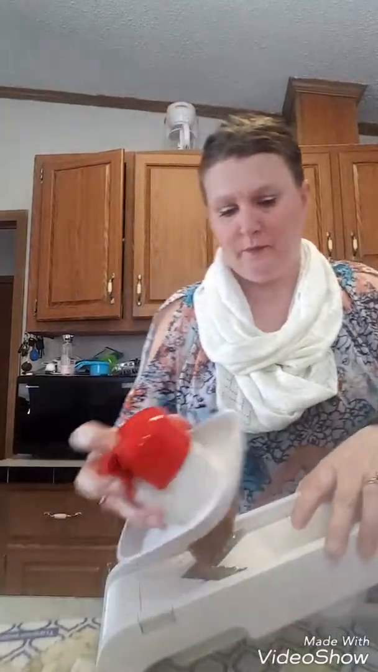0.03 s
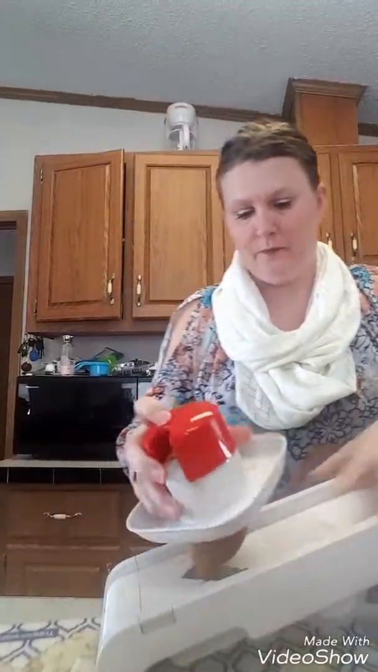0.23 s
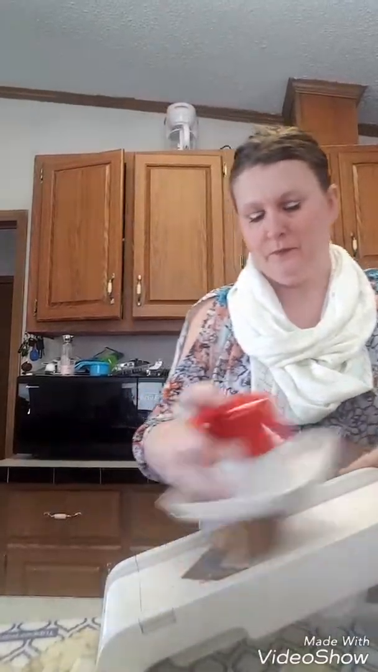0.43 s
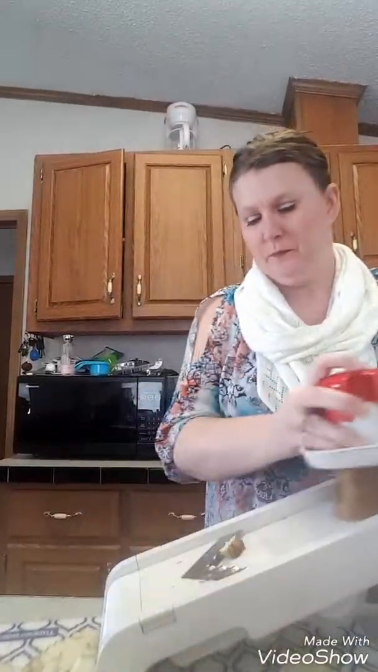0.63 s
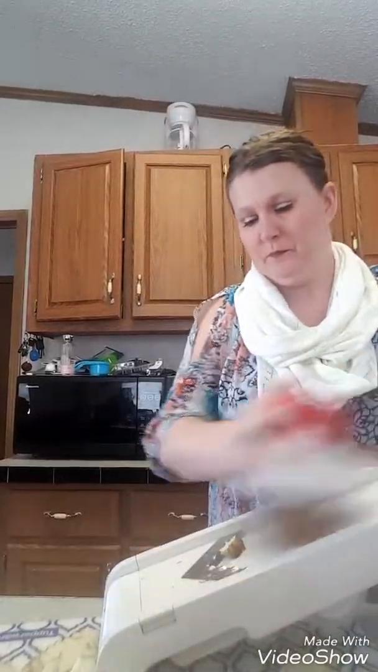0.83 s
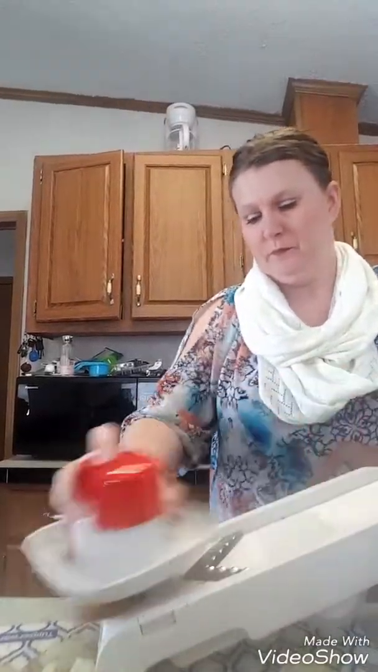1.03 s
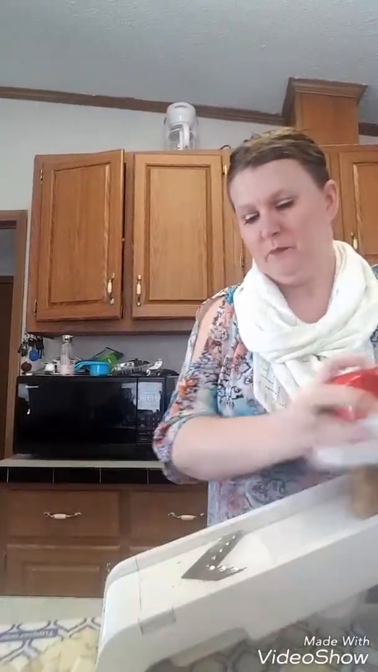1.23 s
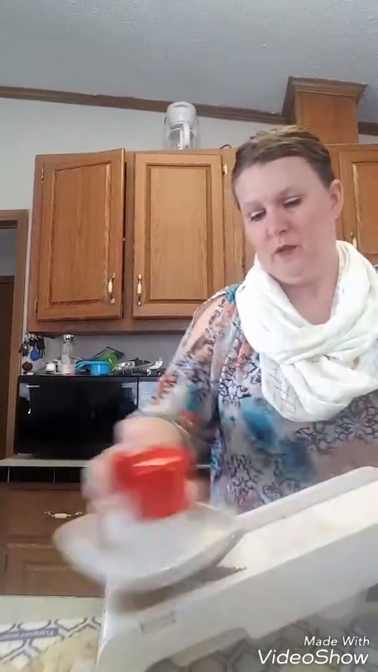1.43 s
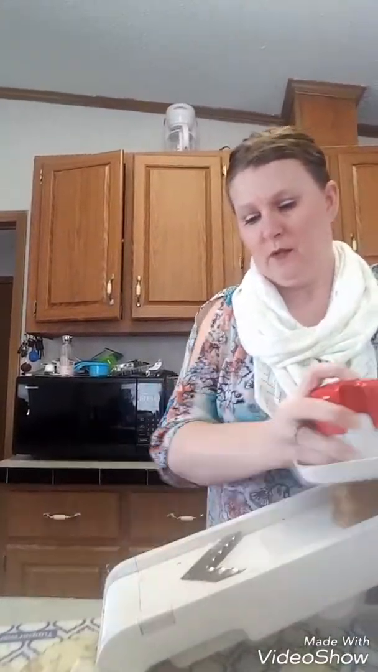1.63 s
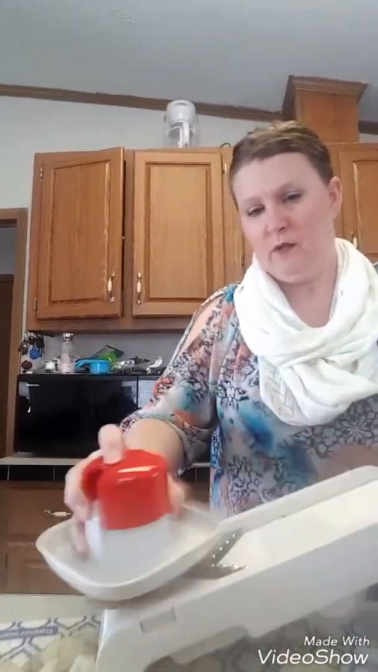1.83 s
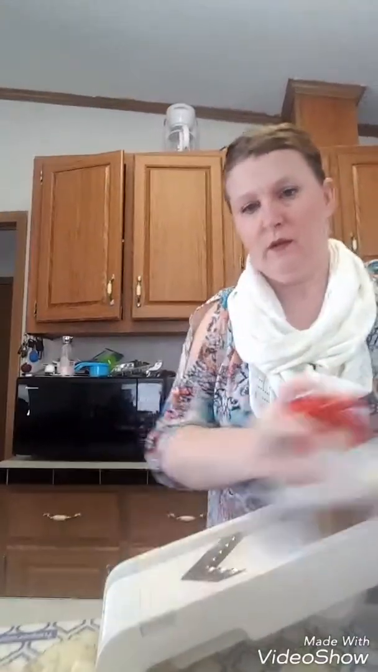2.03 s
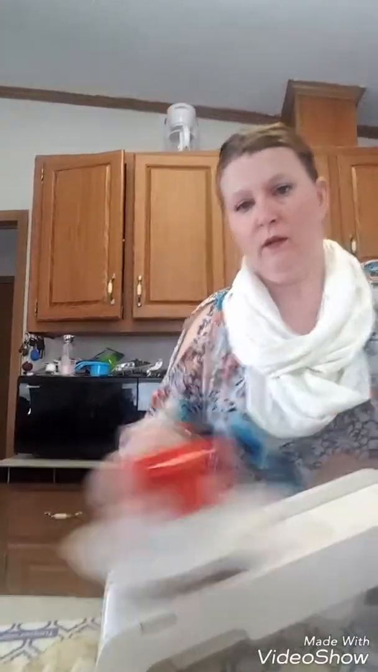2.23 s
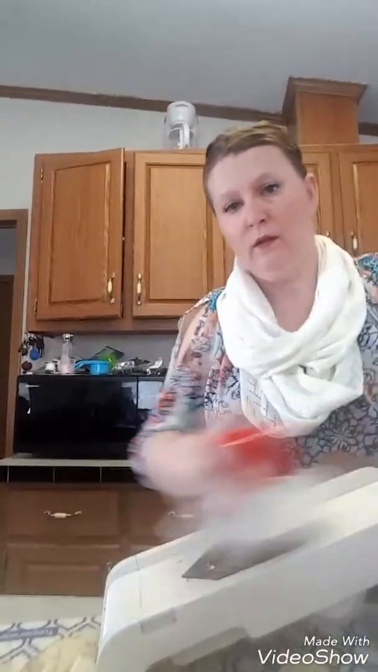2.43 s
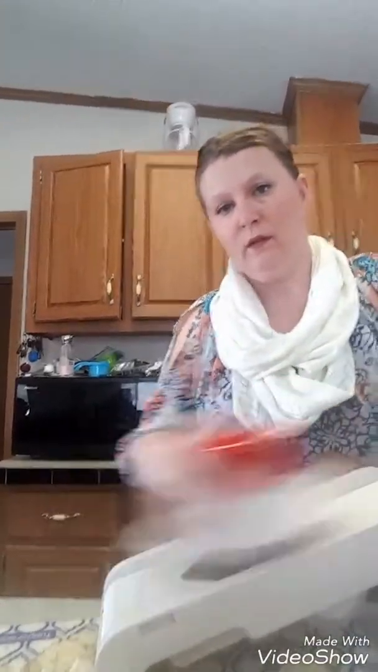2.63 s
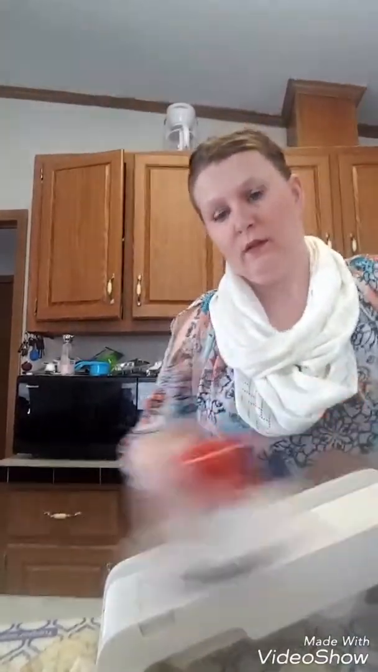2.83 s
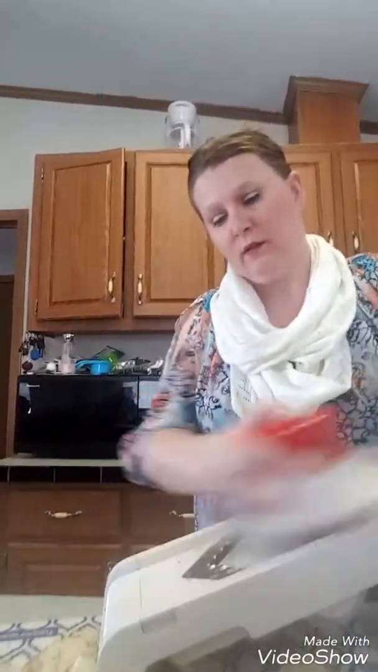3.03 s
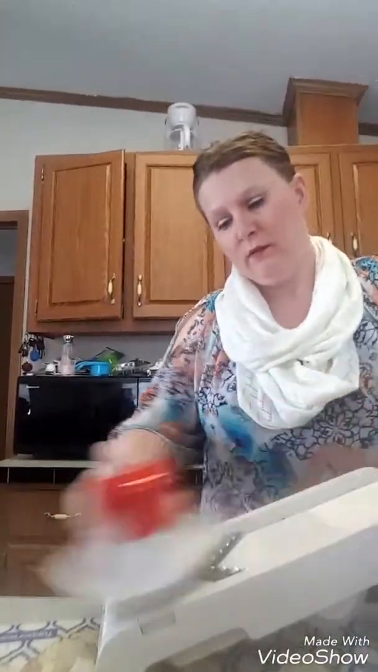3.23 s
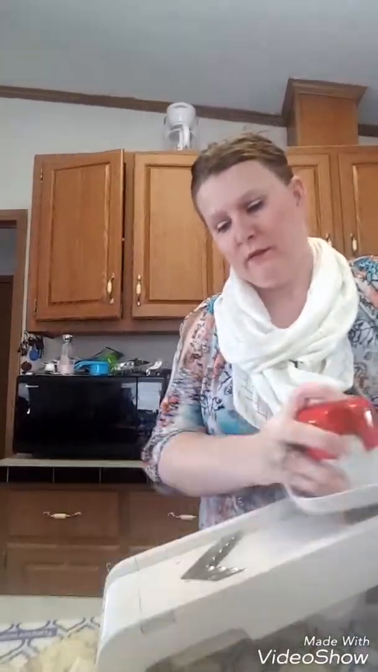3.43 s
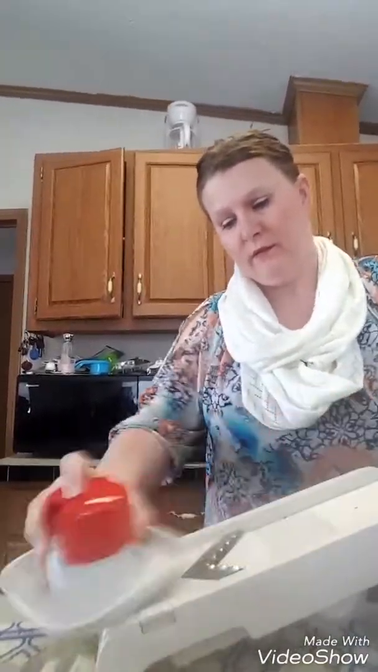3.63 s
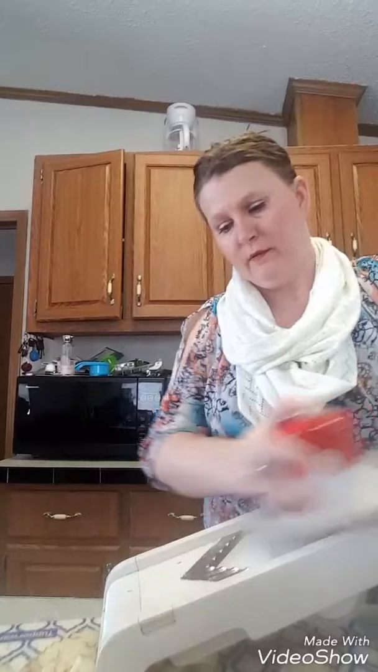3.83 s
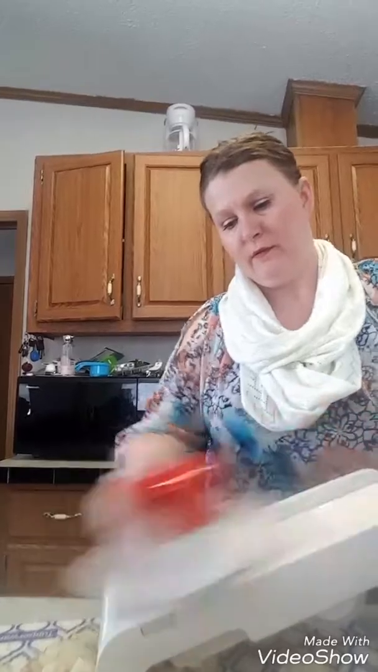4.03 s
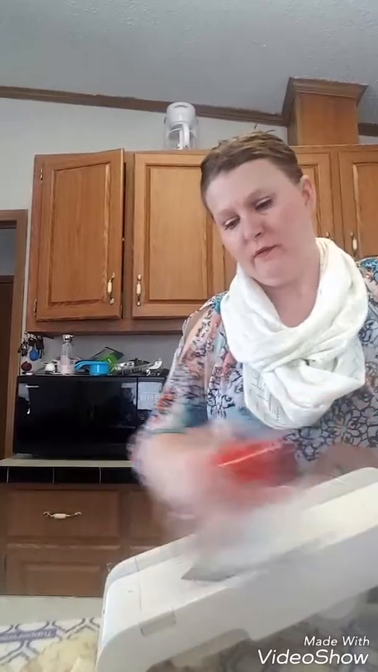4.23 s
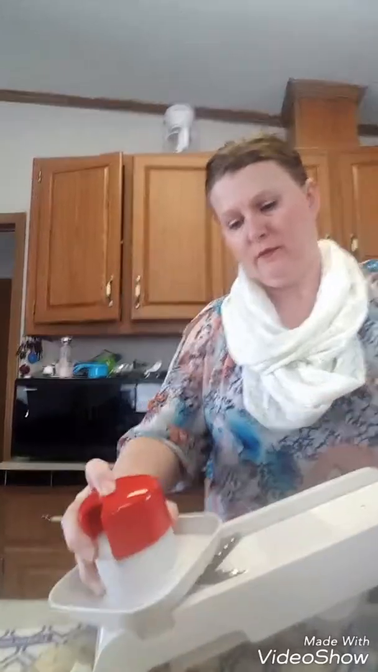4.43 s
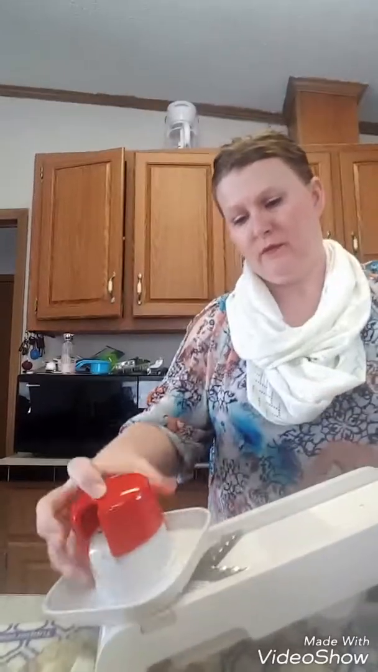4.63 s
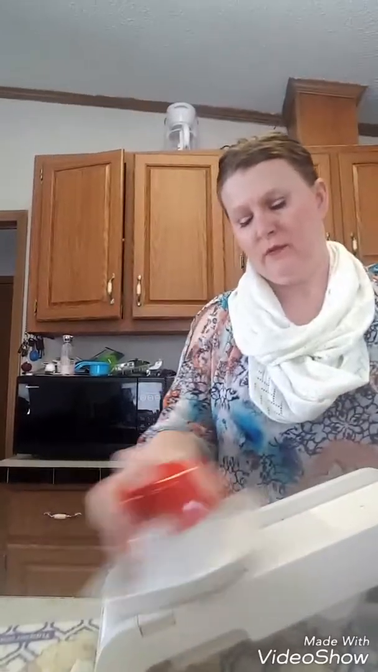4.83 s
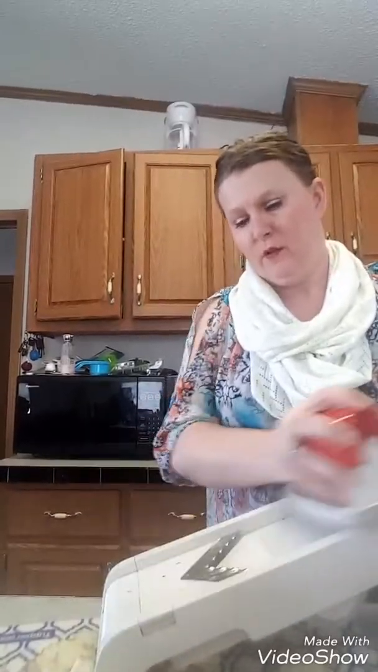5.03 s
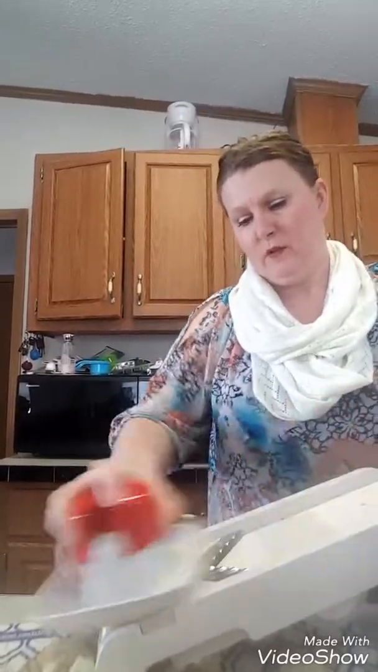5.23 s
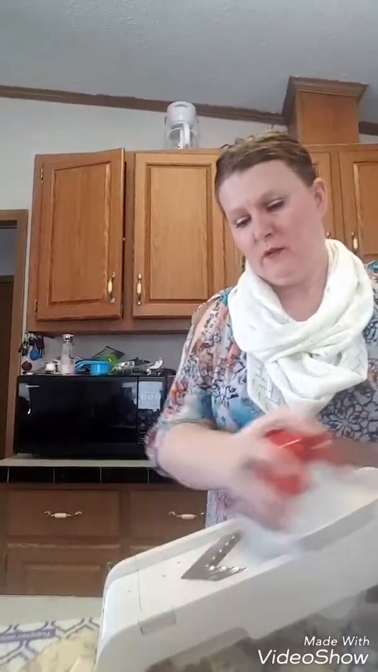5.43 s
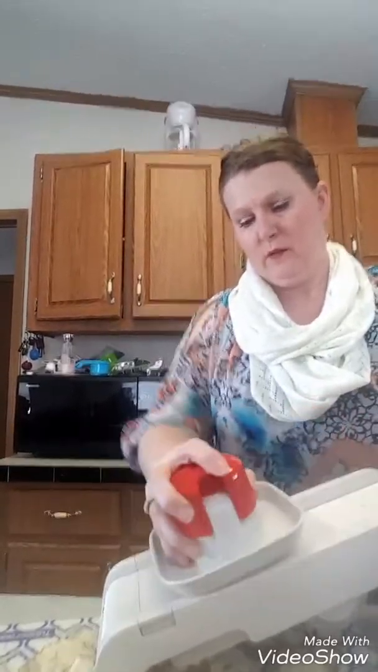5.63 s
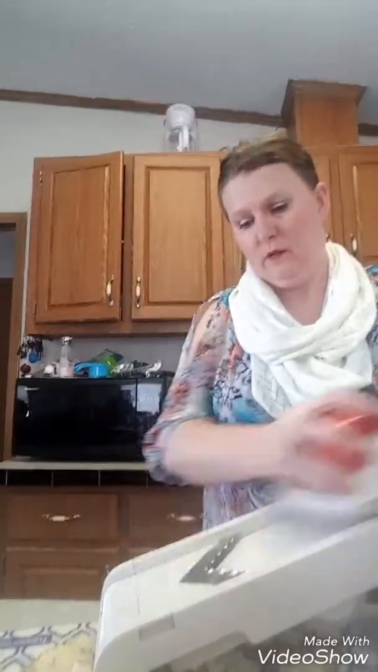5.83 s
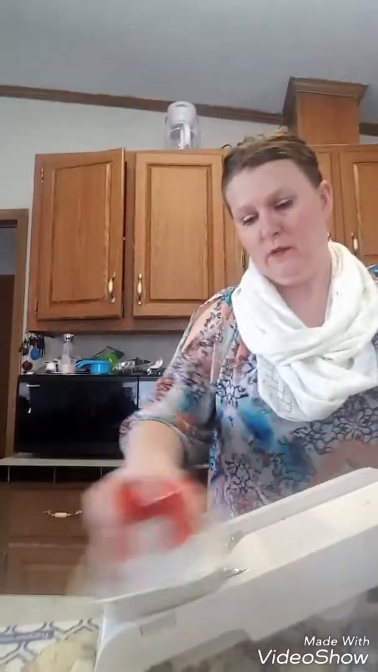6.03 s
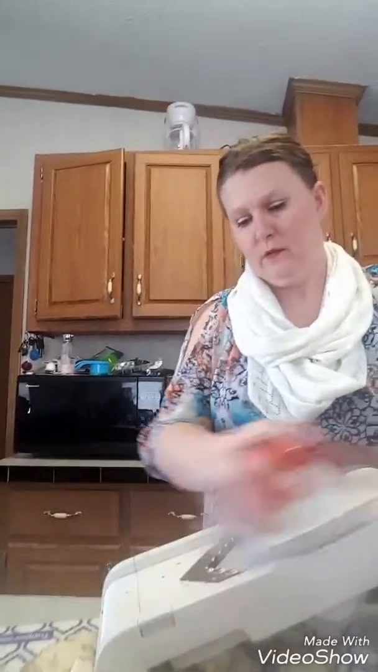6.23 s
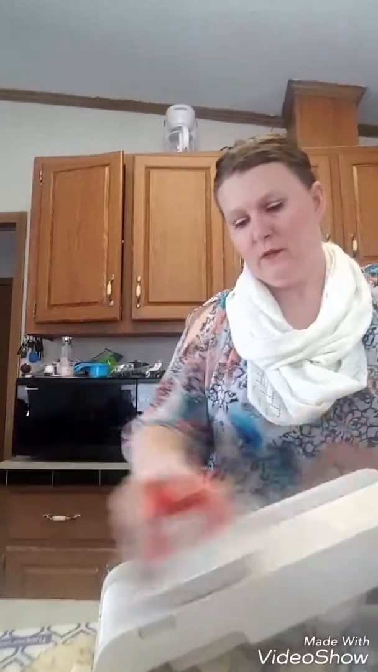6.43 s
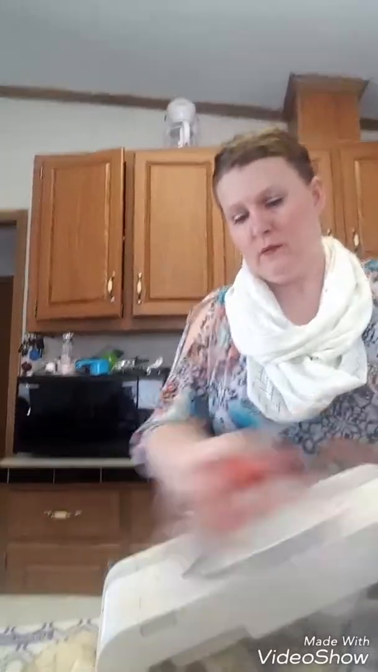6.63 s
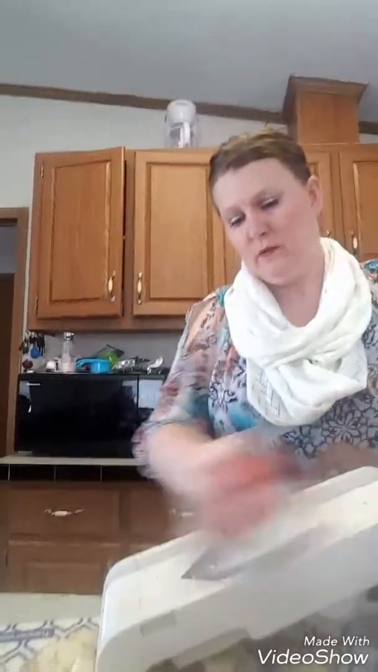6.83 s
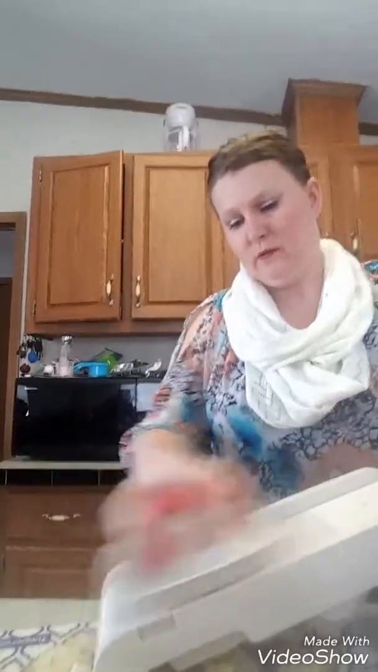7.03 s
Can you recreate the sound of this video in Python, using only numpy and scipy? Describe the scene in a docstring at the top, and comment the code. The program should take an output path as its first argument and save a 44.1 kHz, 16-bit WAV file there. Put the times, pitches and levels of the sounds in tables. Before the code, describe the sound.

Close up in a small lively kitchen, a potato held in a plastic guard scrapes faintly and knocks on a hollow slicer. From about one second, crisp wet cuts come steadily, nearly three a second, with rasping slides, low counter rumble and clacks between. A short pause holds only knocks, then louder, uneven strokes run to the end.

```python
"""A potato in a plastic guard slides over a slicer in a small lively room: first a few faint scrapes and knocks.
From one second on, cuts follow steadily: cells burst at the blade as a bright tearing and the drag rings the frame.
Between cuts stick-slip jolts the counter, rasps the frame and hisses wetly; blows on the hollow frame make its
panels resonate. After 4.4 s the cuts pause amid knocks; from 5.2 s they resume, some faint, to the end at 7.1 s.
Decaying room tails and steady air noise lie beneath, and faint patches flicker between the channels."""
import sys
import numpy as np
from scipy import signal
from scipy.fft import rfft, irfft, next_fast_len
from scipy.io import wavfile
from scipy.ndimage import uniform_filter1d

SR = 44100
rng = np.random.default_rng(int(sys.argv[2]) if len(sys.argv) > 2 else 0)


def to_linear_factor(level_db):
    """Convert decibel levels (scalar or array-like) to linear amplitude factors."""
    exponent = np.asarray(level_db, float) / 20
    return 10 ** exponent


def transcribe(u):
    """Save the signal u as a 16-bit wav file named by the first command-line argument.

    u: samples, shape (n,) or (channels, n), limited to [-1, 1]; the rate is SR.
    q: integer samples, one column per channel.
    """
    v = np.clip(np.atleast_2d(u).T, -1, 1)
    q = np.round(v * 32767).astype(np.int16)
    wavfile.write(sys.argv[1], SR, q)


N = 313110  # samples, 7.1 s

# Blade passing through the potato. Each row: start in seconds, time from start to fullest in seconds,
# length in seconds, tearing level in dB, frame shaking level in dB.
CUT_ROWS = [(0.989, 0.022, 0.07, -23.5, -29.5), (1.489, 0.034, 0.063, -19.5, -28),
            (1.866, 0.024, 0.06, -18.5, -30.5), (2.215, 0.023, 0.064, -20.5, -32.5),
            (2.367, 0.018, 0.072, -27.5, -27.5), (2.576, 0.021, 0.052, -17.5, -30),
            (2.945, 0.032, 0.06, -21.5, -30.5), (3.301, 0.027, 0.051, -18, -28.5),
            (3.657, 0.017, 0.055, -21, -29), (4.01, 0.028, 0.063, -21.5, -28.5),
            (4.373, 0.0091, 0.064, -22, -28.5), (5.242, 0.022, 0.059, -23.5, -25),
            (5.412, 0.021, .06, -31, -24.5), (5.462, 0.0042, 0.048, -44, -29.5),
            (5.61, 0.031, 0.066, -31.5, -35.5), (6.107, 0.015, 0.066, -26, -28.5),
            (6.522, 0.046, 0.065, -22.5, -27.5), (6.762, .006, 0.048, -37, -31.5),
            (6.968, 0.045, .08, -25, -28.5)]
# Guard and potato striking the frame. Each row: time in seconds, clack peak in dB, clack centre in Hz,
# thud peak in dB against the clack, click peak in dB against the clack.
KNOCK_ROWS = [(0.0667, -34, 3120, -13, -20), (0.1565, -36, 1700, -7, -29), (0.5242, -25.5, 3570, -4, 2),
              (0.5531, -22, 2970, -3.5, -6.5), (0.9747, -29.5, 3060, 1.5, -16), (0.9961, -12, 2720, -7, -5),
              (1.2067, -20.5, 2160, -9, -17), (1.2895, -16, 2830, -12.5, -3),
              (1.4814, -25.5, 2940, -6, -20), (1.492, -14.5, 2840, -5, -8), (1.6511, -26, 2090, 3.5, -3),
              (1.699, -15, 2680, -1.5, -1), (1.8662, -13, 2230, -3, -9), (1.9599, -20, 1690, -5, -12),
              (2.0577, -15.5, 2910, -5.5, -6), (2.2189, -12.5, 2730, -8.5, -13),
              (2.3544, -22.5, 1860, -5, -4), (2.3735, -10.5, 3550, -9, -11), (2.4139, -13.5, 2710, -11, -7),
              (2.5765, -14, 2790, -1.5, -6), (2.7212, -22.5, 1830, -8, -4), (2.7771, -17, 1980, -1.5, -6.5),
              (2.8689, -21.5, 1800, -10.5, -23), (2.9282, -15, 2050, -8, -6.5),
              (2.9542, -13.5, 1940, -18, -7), (3.0774, -30, 1880, -3, -21), (3.1462, -17, 2100, -1.5, -2),
              (3.3064, -12.5, 2590, 0, -5), (3.4082, -23, 1790, -4.5, -7), (3.4471, -20.5, 1890, -2.5, -3),
              (3.4945, -19, 1950, 3.5, -8), (3.6012, -39, 1900, 8.5, -4), (3.6471, -21, 2070, -5, -22),
              (3.6611, -16, 2000, -7, -10), (3.8117, -20, 1940, -2, -8), (3.8267, -14.5, 3600, -2.5, -1),
              (3.8581, -10.5, 1760, 1.5, -5), (3.9913, -19, 1990, 10, -12), (4.2213, -18.5, 1820, 4, 0),
              (4.3331, -7.5, 2000, -3, -16), (4.372, -4, 2960, -9.5, 3.5), (4.6543, -27, 1660, -7, -25),
              (4.7227, -40.5, 1660, 8, 3.5), (4.8698, -32, 1650, 2.5, -3), (4.9144, -26, 1870, 1.5, -14),
              (4.9564, -21.5, 2870, -4, -18), (4.9821, -15.5, 2730, -3, -16), (5.017, -9, 2700, 2.5, -14),
              (5.0414, -13.5, 1680, -5.5, -5), (5.2061, -26.5, 1960, 7, -5), (5.233, -12, 1750, -3, -3),
              (5.2784, -15, 2160, -1, -10), (5.3123, -9.5, 3130, -2.5, -10), (5.3274, -19, 1870, 9.5, -8),
              (5.3564, -10, 1600, -14, -17), (5.3677, -6, 3030, -8.5, -6.5), (5.4395, -3, 1760, -24, -25),
              (5.46, 0, 2550, -19, -10), (5.4754, -6.5, 2500, -16.5, -3.5), (5.5824, -25.5, 2120, -3, -8),
              (5.6326, -16, 1680, -10.5, -16), (5.7813, -28.5, 3520, -7.5, 9.5),
              (5.9559, -37.5, 1950, 4, -7), (6.0681, -32, 1890, -0.5, -10), (6.0934, -20.5, 1780, -2, -9),
              (6.114, -6.5, 2040, -15, -1), (6.2223, -18, 1990, -6.5, -20), (6.2706, -25.5, 2220, 2, -5),
              (6.3345, -4, 2000, -6, -15), (6.3604, -11, 1960, -13, -6.5), (6.3924, -7, 1980, -6.5, -12),
              (6.4712, -13.5, 2110, -7, -11), (6.5271, -8.5, 2000, -6, 2.5), (6.6298, -19, 1780, -0.5, -23),
              (6.6707, -26, 2160, 5.5, -8), (6.7466, -8, 1700, -6, -17), (6.7635, -2, 2400, -18.5, -12),
              (6.9825, -11, 2110, -6, -19)]
# Potato sliding along the ramp. Each row: start in seconds, length in seconds, counter rumble in dB,
# frame scrape in dB, wet hiss in dB.
STROKE_ROWS = [(-.08, 0.13, -32.5, -36.5, -40.5), (.14, 0.063, -56, -54, -68),
               (0.253, 0.034, -53, -76, -54.5), (0.339, 0.1, -59, -50.5, -70),
               (0.499, 0.098, -40.5, -45, -46), (0.61, 0.11, -53, -65, -55.5),
               (0.941, 0.042, -51, -46, -53), (0.956, 0.15, -40, -47, -40), (1.141, 0.065, -42, -47, -53),
               (1.188, 0.15, -35, -38.5, -36), (1.44, 0.16, -39.5, -47, -41), (1.606, .13, -35, -36, -37.5),
               (1.838, .1, -38, -43, -48), (1.966, .13, -32, -32.5, -36), (2.184, 0.12, -42.5, -34, -51),
               (2.31, .04, -51, -42.5, -49), (2.331, .13, -32, -41, -34.5), (2.548, 0.12, -40, -54, -40.5),
               (2.691, 0.14, -30, -38.5, -39.5), (2.907, 0.13, -41, -37.5, -37),
               (3.067, 0.11, -28, -30.5, -34), (3.301, 0.08, -37.5, -51, -45),
               (3.425, 0.098, -28, -35, -38.5), (3.624, 0.14, -39, -45, -44), (3.784, .12, -31, -27.5, -38),
               (3.978, 0.12, -41, -39, -32.5), (4.125, 0.14, -29, -27, -34.5),
               (4.312, 0.18, -37.5, -41, -37.5), (4.492, .1, -45, -45.5, -57), (4.635, 0.11, -53, -55, -61),
               (4.856, .06, -56, -44.5, -50), (4.899, .21, -31.5, -30, -35),
               (5.162, 0.26, -36.5, -31.5, -33), (5.396, .14, -39.5, -47, -31.5),
               (5.554, .14, -39, -40.5, -37.5), (5.756, 0.11, -50, -51.5, -54),
               (5.842, 0.088, -52, -48.5, -58), (5.916, 0.13, -51, -56, -58.5), (6.086, 0.1, -38, -39, -34),
               (6.241, 0.099, -43, -33.5, -36), (6.316, 0.12, -33, -32.5, -36),
               (6.453, 0.16, -37.5, -44, -33), (6.623, 0.13, -40.5, -41, -37.5),
               (6.72, 0.12, -34, -41, -33.5), (6.882, 0.2, -38, -35.5, -33.5)]
# Resonances of the hollow plastic frame. Each row: frequency in Hz, width in Hz before added damping, level in dB.
FRAME_MODES = [(253, 25, -13), (416, 21, -11), (509, 72, 4), (778.4, 98, 7.5), (897, 40, 0.5),
               (1027, 114, 0.5), (1247, 38, -2), (1846, 116, -4.5), (2143, 280, -9), (2640, 106, -12),
               (2915, 330, -4.5), (3400, 220, -14.5), (4970, 280, 3), (5700, 1770, 4), (8140, 1100, -22),
               (11900, 410, -31.5)]
# Resonances of the counter. Each row: frequency in Hz, width in Hz before added damping, level in dB.
COUNTER_MODES = [(56.7, 38, 1), (108, 6, 2), (152, 30, 3.5), (231.7, 28, 0)]
# Spectrum of the tearing cells. Each row: frequency in Hz, relative level in dB per Hz.
TEAR_SPECTRUM = [(710, -12), (1200, -7.5), (1350, -13), (1850, -2.5), (2340, -6.5), (3030, -4.5),
                 (4820, -0.5), (5200, -5.5), (5920, 1.5), (7270, -6), (8270, -2.5), (11400, -9.5),
                 (13200, -13.5), (14800, -20), (15800, -17)]
# Spectrum of the wet slide. Each row: frequency in Hz, relative level in dB per Hz.
HISS_SPECTRUM = [(710, -7), (1200, 3.5), (1440, -8.5), (1690, -3), (2640, -4), (4520, -12), (5730, -6),
                 (7190, -15), (8450, -11), (11400, -27.5), (12900, -23.5), (14700, -36.5), (15800, -47)]
# Hand resting on the guard. One row: rumble in dB, scrape in dB, hiss in dB.
REST_LEVELS = [-64.5, -65, -70]
# Thud centre as the guard sinks onto the frame with the thinning potato, before the spread by spot struck.
# Each row: time in seconds, frequency in Hz.
THUD_CENTRE = [(0, 760), (1.5, 710), (1.7, 440), (4.2, 460), (4.4, 610), (5.4, 645), (6.0, 760), (7.1, 720)]
# Decay of the room. Each row: frequency in Hz, time to fall by 60 dB in seconds.
ROOM_DECAY = [(100, 0.43), (300, 0.19), (700, 0.29), (1840, 0.28), (4850, 0.23), (12800, 0.2)]
# Spectrum of the room noise. Each row: frequency in Hz, relative level in dB per Hz.
AIR_SPECTRUM = [(15, -36), (25, 5.5), (307, -6.5), (361, -2), (812, -13), (1390, -19), (1640, -17),
                (1980, -20.5), (6140, -24.5), (13100, -38), (15800, -42)]
# Overall tone: weak deep bass, uneven treble, nothing above about 16 kHz. Each row: frequency in Hz, gain in dB.
OVERALL_TONE = [(25, -26), (45, -10), (70, 1.5), (6300, 2), (7250, -2), (8300, 3), (11400, -7.5),
                (13000, 9.5), (15500, -2), (15900, -6), (16300, -60)]
# Patches that flicker between the channels. Each row: frequency in Hz, gain in dB.
FLICKER_GAIN = [(40, -15), (100, -22), (3000, -23), (6000, -17), (9000, -8.5), (14000, -9)]


def cut(start, fullest, length, tear_db, shake_db):
    """Fracture noise: cells burst densely along the blade while the drag excites the frame's resonances."""
    bite_db, exit_db, shake_sag_db = -8.5, -10, -0.5  # tearing at entry and exit; fall of the shaking over the cut
    attack_s, release_s = 0.0034, 0.023
    t = np.arange(0, length, 1 / SR)
    bursts = patchy(len(t), 9000, 2.5, 160, 2.8) * lumps(len(t), 420, 1.73)
    tear = evened(coloured(bursts, TEAR_SPECTRUM))
    drag = crackle(len(t), 1200, 2.65) * lumps(len(t), 85, 6.0)
    frame = ring(FRAME_MODES[:11], damping=1.24, spread_db=3)
    shake = evened(np.convolve(drag, frame)[:len(t)])
    fade = np.clip(t / attack_s, 0, 1) * np.clip((length - t) / release_s, 0, 1)
    depth_db = np.interp(t, [0, fullest, length], [bite_db, 0, exit_db])
    tearing = to_linear_factor(tear_db + depth_db) * tear
    shaking = to_linear_factor(shake_db + shake_sag_db * t / length) * shake
    return start, fade * (tearing + shaking)


def slide():
    """Stick-slip friction on the ribbed ramp: jolts in the counter, scrape in the frame, wet hiss."""
    rumble, scrape, hiss = stroke_levels()
    contact = lumps(N, 60, 3.15)
    jolts = signal.oaconvolve(crackle(N, 600, 1.5), ring(COUNTER_MODES, damping=1.27))[:N]
    # The contact moves along the frame: one of six spots, drawn anew every 2600 samples
    spot = np.repeat(rng.integers(0, 6, N // 2600 + 1), 2600)[:N]
    slips = crackle(N, 700, 4.7) * contact
    rasp = np.zeros(N)
    for k in range(6):
        frame = evened(ring(FRAME_MODES[:11], damping=1.15, spread_db=3.5))
        rasp += signal.oaconvolve(slips * (spot == k), frame)[:N]
    rasp = coloured(rasp, [(300, 0.5), (1000, 0.0), (3000, -4.5)])
    wet = coloured(patchy(N, 5000, 1.4, 48, 3.0) * contact, HISS_SPECTRUM)
    return rumble * evened(jolts) + scrape * evened(rasp) + hiss * evened(wet)


def stroke_levels():
    """Friction noise grows with speed: each stroke speeds up, slows and settles; gains of rumble, scrape, hiss."""
    fastest, swell = 0.47, 1.41  # share of the stroke at top speed; level ~ speed ** swell
    settle_db_per_s = 218  # dying away after the stroke
    power = np.tile(to_linear_factor(REST_LEVELS)[:, None] ** 2, N)
    for start, length, *levels_db in STROKE_ROWS:
        t = np.arange(max(-start, 0), length + 0.3, 1 / SR)
        phase = np.interp(t, [0, fastest * length, length], [0, 1, 1.7])
        speed = np.sin(np.pi / 2 * phase)
        shape = speed ** swell * to_linear_factor(-settle_db_per_s * np.maximum(t - length, 0))
        for layer, db in zip(power, levels_db):
            add(layer, max(start, 0), (to_linear_factor(db) * shape) ** 2)
    return np.sqrt(power)


def knock(s, peak_db, clack_hz, thud_db, click_db):
    """Impact excitation: a short uneven chatter of contact rings the frame as thud, clack and click."""
    thud_spread = 0.29  # octaves, by the spot struck
    u = np.arange(1500) / SR / 0.0028  # time in units of 2.8 ms
    chatter = crackle(1500, 9000, 2.96) * u ** 0.91 * np.exp(-u * 1.7)
    sound = np.convolve(chatter, ring(FRAME_MODES, damping=1.11, spread_db=2.4))

    def near(hz, away_db):
        """Local excitation: panels nearest the blow ring most."""
        return coloured(sound, [(hz / 2.58, away_db), (hz, 0), (hz * 2.06, away_db)])

    thud_hz = np.interp(s, *np.transpose(THUD_CENTRE)) * 2 ** (thud_spread * rng.standard_normal())
    thud = band(near(thud_hz, -10), 201, 1405)
    clack = band(near(clack_hz, -12.5), 1290, 4060)
    click = band(sound, 4470, 12500)
    blow = 0
    for part, db in ((thud, thud_db), (clack, 0), (click, click_db)):
        blow = blow + to_linear_factor(peak_db + db) * part / abs(part).max()
    return s, blow


def kitchen(x):
    """Reverberation: three sparse tails, each band decaying at its own rate, mixed in a steady rotation."""
    taps = np.zeros((3, SR // 2))
    # One echo of random sign at a random place in every 20 samples
    at = np.arange(130, SR // 2 - 20, 20) + rng.integers(0, 20, (3, (SR // 2 - 131) // 20))
    np.put_along_axis(taps, at, rng.choice([-1., 1.], at.shape), 1)
    hz, t, z = signal.stft(taps, SR, nperseg=256)
    room_hz, room_t60 = np.transpose(ROOM_DECAY)
    t60 = np.interp(np.log(hz + 1), np.log(room_hz), room_t60)
    tails = signal.istft(z * to_linear_factor(-60 * t / t60[:, None]), SR, nperseg=256)[1]
    # 1.3 turns a second, so the echoes keep changing
    cycles = 1.3 * np.arange(N) / SR + np.arange(3)[:, None] / 3
    turn = np.cos(2 * np.pi * cycles) * np.sqrt(2 / 3)
    return signal.fftconvolve(x * turn, tails / np.linalg.norm(tails[0]), axes=1)[:, :N].sum(0)


def air():
    """Stationary noise: quiet steady room noise of fixed spectrum."""
    return to_linear_factor(-54.5) * evened(coloured(rng.standard_normal(N), AIR_SPECTRUM))


def ring(modes, damping=1, spread_db=0):
    """Modal impulse response to a tap; another spot struck, or another grip, weights and detunes the modes."""
    hz, width, db = np.transpose(modes)[:, :, None]
    t = np.arange(3000) / SR
    weight = to_linear_factor(db + spread_db * rng.standard_normal(db.shape)) * width
    hz = hz * (1 + 0.0086 * spread_db * rng.standard_normal(db.shape))
    decay = np.exp(-np.pi * width * damping * t)
    return (weight * decay * np.sin(2 * np.pi * hz * t)).sum(0)


def patchy(size, per_s, spread_db, hz, depth_db):
    """Independent band modulation: crackle whose colour shifts as each band swells and stalls on its own."""
    edges = [600, 1800, 3200, 5200, 7400, 11000, 16000]  # Hz
    total = np.zeros(size)
    for low_hz, high_hz in zip(edges, edges[1:]):
        grains = crackle(size, per_s, spread_db) * lumps(size, hz, depth_db)
        total += band(grains, low_hz, high_hz)
    return total


def crackle(size, per_s, spread_db):
    """Random impulse process: clicks of both signs, a few much larger."""
    big = to_linear_factor(spread_db * np.minimum(rng.exponential(1, size), 4))
    return evened(big * rng.standard_normal(size) * (rng.random(size) < per_s / SR))


def lumps(size, hz, depth_db):
    """Amplitude modulation by uneven contact: a random gain that changes up to about hz times a second."""
    steps = rng.standard_normal(size // 40 + 2)  # one step per 40 samples
    smooth = signal.lfilter(*signal.butter(1, hz * 80 / SR), steps)
    return evened(to_linear_factor(depth_db * np.repeat(evened(smooth), 40)[:size]))


def coloured(x, points):
    """Linear filtering by a spectrum of (Hz, dB) points, joined along log frequency."""
    size = next_fast_len(len(x) + 512)
    hz, db = np.transpose(points)
    shape_db = np.interp(np.log(np.fft.rfftfreq(size, 1 / SR) + 1), np.log(hz + 1), db)
    return irfft(rfft(x, size) * to_linear_factor(shape_db), size)[:len(x)]


def band(x, low_hz, high_hz):
    """Band-pass filtering: keeps one band and lowers the rest by up to 40 dB."""
    return coloured(x, [(low_hz * 0.8, -40), (low_hz, 0), (high_hz, 0), (high_hz * 1.2, -40)])


def evened(x):
    """Power normalization: scales to rms 1."""
    return x / np.sqrt(np.mean(x ** 2) + 1e-20)


def add(mix, s, sound):
    """Superposition: adds a sound into the mix at s seconds."""
    part = mix[round(s * SR):][:len(sound)]
    part += sound[:len(part)]


def scene():
    """Superposition at one microphone: slicer, its reverberation at a gain of -7 dB, and air."""
    slicer = slide()
    for row in CUT_ROWS:
        add(slicer, *cut(*row))
    for row in KNOCK_ROWS:
        add(slicer, *knock(*row))
    return np.tile(slicer + to_linear_factor(-7) * kitchen(slicer) + air(), (2, 1))


def channel_flicker(heard):
    """Decorrelation: faint patches of random phase, mostly treble, flicker between the channels."""
    hz, t, z = signal.stft(heard, SR, nperseg=1024)
    chance = uniform_filter1d(rng.standard_normal(z.shape), 30, 0)
    chance = evened(uniform_filter1d(chance, 3, 1))
    treble_db = 10 * np.log10((abs(z[150:]) ** 2).sum(0) + 1e-12)  # above about 6.5 kHz
    # More patches above 7.6 kHz and when the treble is loud
    on = chance + 0.09 * (treble_db + 36) + 1.6 * (hz[:, None] > 7600) > -0.3
    random_phase = np.exp(2j * np.pi * rng.random(z.shape))
    patches = signal.istft(z * on * random_phase, SR, nperseg=1024)[1][:N]
    return coloured(patches, FLICKER_GAIN)


def roll_off(x):
    """The treble ends steeply here."""
    return signal.sosfilt(signal.butter(12, 15950, fs=SR, output="sos"), x)


def record(dry):
    """Filtering, decorrelation and soft saturation: overall tone, then flicker of opposite sign in each channel."""
    heard = coloured(dry[0], OVERALL_TONE)
    flicker = channel_flicker(heard)
    mix = np.tanh(heard + np.array([flicker, -flicker]))
    return roll_off(mix)


dry = scene()
out = record(dry)
transcribe(out)
```